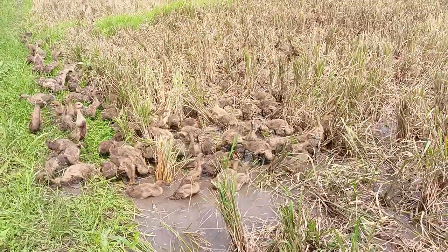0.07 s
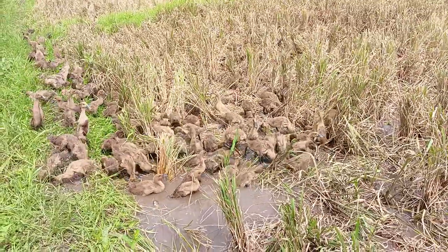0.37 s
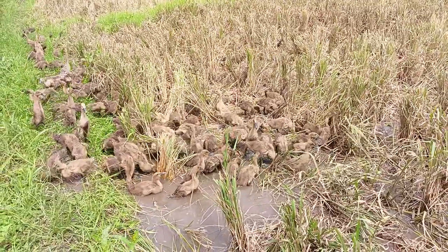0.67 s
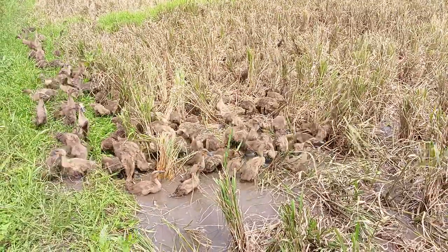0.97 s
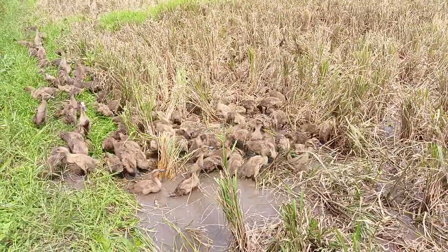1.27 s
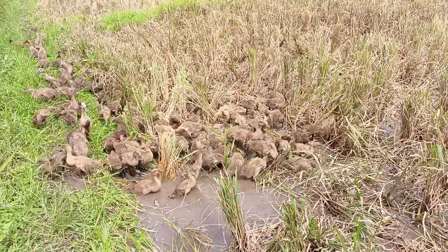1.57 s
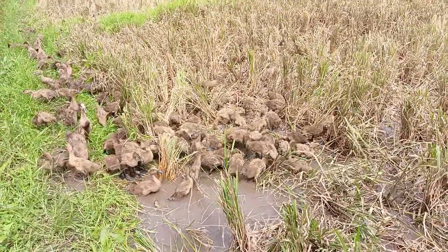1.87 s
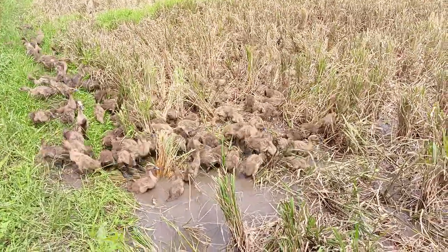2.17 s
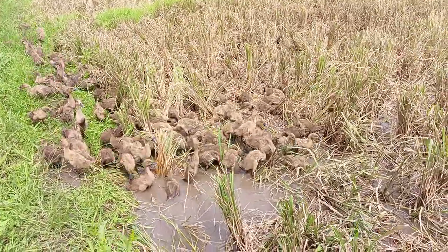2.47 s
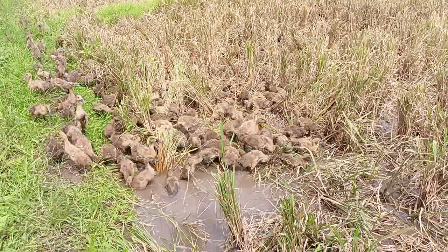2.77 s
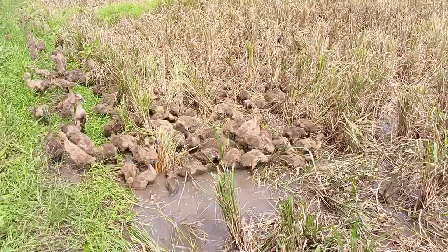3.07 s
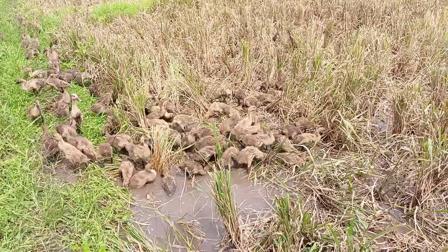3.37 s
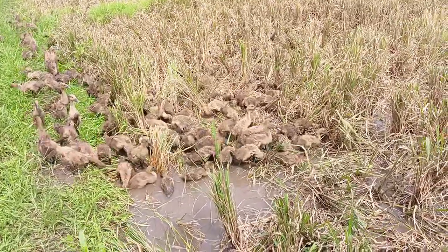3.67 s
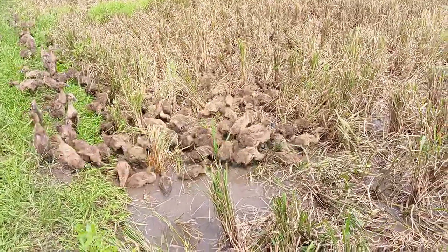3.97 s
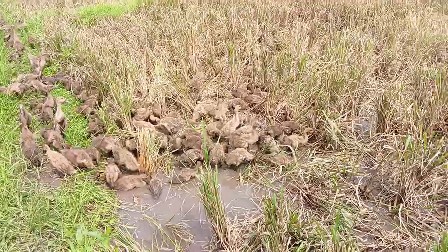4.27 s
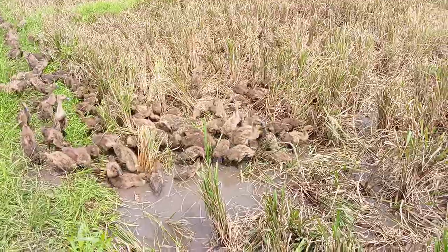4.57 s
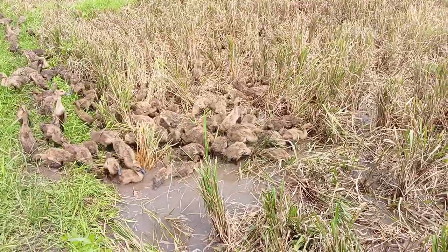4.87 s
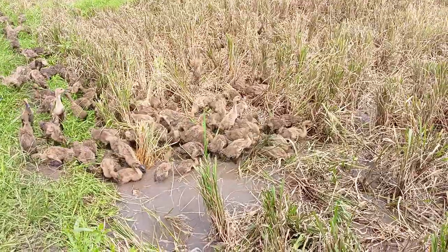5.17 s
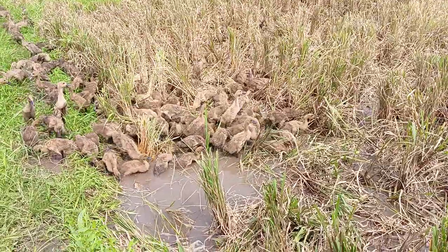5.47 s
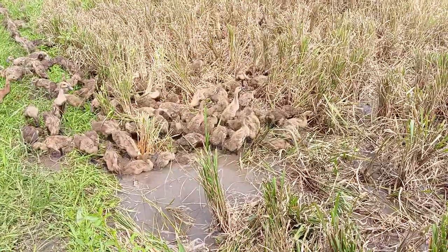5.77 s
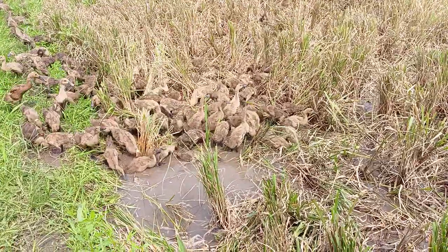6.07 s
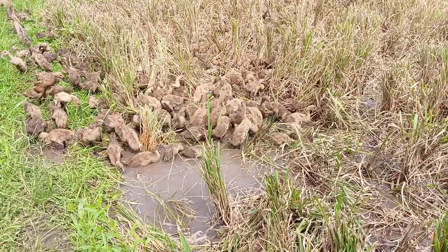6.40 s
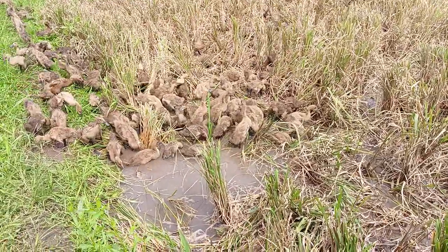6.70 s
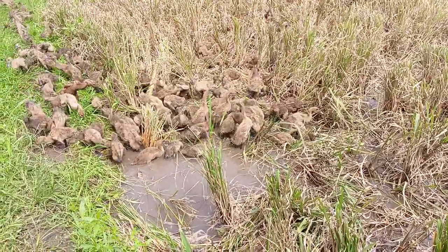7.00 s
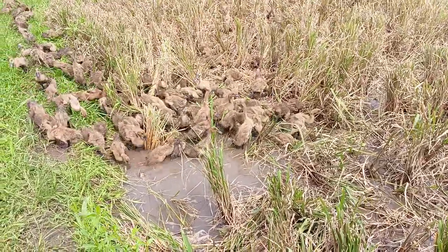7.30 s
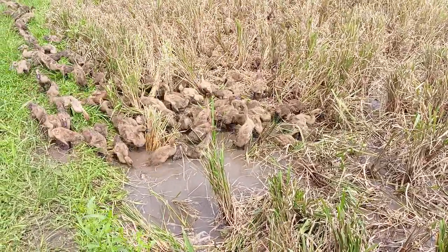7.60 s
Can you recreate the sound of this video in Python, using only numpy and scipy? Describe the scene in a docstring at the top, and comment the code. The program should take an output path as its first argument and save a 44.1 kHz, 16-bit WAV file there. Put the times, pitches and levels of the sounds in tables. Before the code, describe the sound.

At the muddy edge of a field, many young ducks call in thin, slightly hoarse peeps, a few standing out from the chorus. Their feeding makes a steady wet patter with little splashes, plops and crackling dry straw. Low gusts of wind soon buffet the microphone, more on the left, are strongest around four seconds and ease toward the end.

```python
"""From the start, ducklings a few metres away at the muddy edge of a rice field peep over one another in
short arched whistles, while their bills set bubbles ringing and their feet crack the straw. At 0.7 s
the wind rises, and its turbulent pressure buffets the two microphone ports, the left one more.
The loudest wet slaps follow near 1 s. The gusts peak just after 4 s and then weaken, while the
peeping and feeding go on to the end over the hush of the field."""
import sys
import numpy as np
from scipy import signal
from scipy.fft import rfft, irfft, next_fast_len
from scipy.io import wavfile

SR = 44100
rng = np.random.default_rng(int(sys.argv[2]) if len(sys.argv) > 2 else 0)


def output_pcm(signal):
    """Save a mono or channel-first signal as 16-bit PCM at the path in sys.argv[1].

    Samples are clipped to [-1, 1] before scaling.
    """
    pcm = np.clip(np.atleast_2d(signal).T, -1, 1) * 32767
    wavfile.write(sys.argv[1], SR, np.round(pcm).astype(np.int16))


N = 336924

PEEP_FALL, PEEP_GLIDE = .02, 0.0395   # mean fall and its spread per half call, as shares of the pitch
# Near calls: (mid time [s], mid frequency [Hz], duration [s], relative level [dB], left-right [dB])
NEAR_CALLS = [(.019, 2090, 0.065, -37, 9), (.03, 2630, 0.034, -31, -7), (0.067, 2406, 0.054, -34.5, -6),
              (.152, 2380, .045, -36, 0), (0.25, 2740, 0.0445, -39.5, -1), (.337, 2705, .045, -30.5, 1),
              (.402, 2670, 0.028, -32, 7), (1.14, 2430, 0.093, -37, 1), (1.26, 2670, 0.038, -31, 6),
              (1.384, 3420, .04, -43, -2), (1.463, 1790, 0.096, -45, -5), (1.76, 2240, 0.043, -35.5, -5),
              (1.976, 2560, 0.063, -36.5, -5), (2.133, 2520, .04, -37, -5), (2.235, 2560, 0.03, -36.5, -1),
              (2.273, 2650, .045, -35.5, 8), (2.451, 2515, 0.047, -38, 9), (2.627, 1900, .05, -41.5, 5),
              (2.728, 2310, 0.081, -39, 0), (2.82, 2640, 0.11, -35.5, 5), (3.108, 2130, .08, -45, 4),
              (3.152, 2530, 0.056, -38, 0), (3.549, 2900, 0.053, -41, -6), (3.708, 2480, .08, -35, 0),
              (3.78, 2640, 0.06, -39, 1), (3.837, 2580, .06, -32, 7), (3.909, 2820, 0.034, -43, 2),
              (4.157, 2500, 0.047, -35, -4), (4.635, 2580, 0.056, -37, -6), (4.664, 2377, 0.077, -28, -17),
              (4.837, 2350, .055, -33.5, 0), (4.951, 2750, 0.05, -32, 2), (5.037, 2730, 0.025, -33.5, 7),
              (5.205, 2624, .055, -38.5, 1), (5.49, 2750, 0.061, -39.5, -1), (5.517, 2130, 0.066, -40, -2),
              (5.777, 2690, 0.058, -35, -6), (6.049, 2720, 0.029, -36, -3), (6.133, 2650, 0.031, -35, -5),
              (6.693, 2205, 0.036, -34.5, -6), (6.771, 2280, 0.044, -34, -7.5),
              (6.808, 2100, 0.057, -35.5, 3), (7.02, 2610, 0.044, -36, -7), (7.21, 2310, 0.036, -33, -2),
              (7.448, 3070, 0.037, -42, -10)]
def near_birds(level_db=-3.73):
    """Frequency glide: the peeps that stand out of the flock slide down more often than up."""
    out = np.zeros((2, N))
    for s, hz, length, db, pan_db in NEAR_CALLS:
        call = peep(hz, length, PEEP_GLIDE * rng.normal() - PEEP_FALL, hoarse=0.67, port_phase=1.0)
        add(out, s - length / 2, from_db(db + level_db) * panned(pan_db) * call)
    return out


def peep(hz, length, glide, hoarse, arch=0.1184, waver=0.019, rough=0.66, octave_db=-28, port_phase=1.22):
    """Modulation: a whistle arches in frequency and amplitude; random jitter in both makes it hoarse."""
    size = max(int(length * SR), 64)
    u = np.linspace(-1, 1, size)
    pitch = hz * (1 + glide * u - arch * u ** 2 + hoarse * waver * drift(489.5, size=size))
    # each bird stands at its own angle, so it reaches the ports out of step
    phase = 2 * np.pi * np.cumsum(pitch) / SR + np.array([[.5], [-.5]]) * port_phase * rng.normal()
    swell = np.abs(np.cos(u * np.pi / 2)) ** 1.4 * (1 + hoarse * rough * drift(487.3, size=size))
    return np.sqrt(2) * swell * (np.sin(phase) + from_db(octave_db) * np.sin(2 * phase))


# Calling of the rest of the flock, with a few lulls: (time [s], relative level [dB])
FLOCK_ENVELOPE = [(0, -52), (.45, -43.5), (.56, -57.5), (.82, -46.5), (1.0, -51), (1.12, -44),
                  (1.28, -45.5), (1.35, -53), (1.5, -47), (2.9, -47.5), (3.0, -45.5), (3.28, -41),
                  (3.33, -64), (3.5, -55), (3.6, -45), (5.4, -47.5), (6.9, -46.5), (7.64, -47)]
def flock(far_db=-1.0, middle_db=-9.5, low_db=-58):
    """Superposition: a blur of far peeps, clearer ones from mid-flock and faint low chirps add up."""
    far = from_db(far_db) * chorus(2480, spread=.135, length=.055, hoarse=0.86, count=420, uneven_db=2.5)
    middle = chorus(2542, spread=.16, length=0.077, hoarse=0.72, count=80, uneven_db=3.5)
    low = from_db(low_db) * chorus(1748, spread=0.1, length=.045, hoarse=1.0, count=90)
    return from_db(in_time(FLOCK_ENVELOPE)) * (far + from_db(middle_db) * middle) + low


def chorus(centre_hz, spread, length, hoarse, count, uneven_db=3.0):
    """Incoherent sources: many birds call, each at its own pitch and moment; rms 1."""
    out = np.zeros((2, N))
    for k, (pitch, size, glide, loud, side, late) in enumerate(rng.standard_normal((count, 6))):
        hz = centre_hz * np.exp(spread * np.tanh(pitch))
        call = peep(hz, length * np.exp(.25 * size), 0.0496 * glide - PEEP_FALL, hoarse)
        onset = (k + late / 2) / count * N / SR - length / 2
        add(out, onset, from_db(uneven_db * loud) * panned(4 * side - 1.5) * call)
    return rms_one(out)


# Activity of bills and feet: (time [s], relative level [dB])
FEEDING_ENVELOPE = [(0, -46.5), (.7, -49.5), (1.65, -48.5), (1.85, -49.5), (2.3, -47.5), (3.7, -48.5),
                    (4.35, -51.5), (4.65, -50), (4.8, -46), (5.2, -51.5), (6.1, -48), (6.27, -53),
                    (6.55, -51), (7.64, -48.5)]
# Spectral weighting of the bubbles: (frequency [Hz], relative gain [dB])
BUBBLE_SPECTRUM = [(350, 0), (700, -7), (1050, 0.5), (1400, -2), (1800, 1.5), (3000, -2.5), (3500, 4),
                   (4200, 0), (5200, -11), (7400, -10), (9500, -21), (12000, -23), (15500, 16.5)]
def dabbling(per_s=7500, size_db=2.0, clump_db=2.5, level_db=0.5, bands=30, cycles=17):
    """Bubble resonance: bills sieve the mud, freeing clumps of tiny bubbles that each ring briefly."""
    out, busy = np.zeros((2, N)), from_db(clump_db * drift(30))
    underflow_guard = 1e-18 * rng.standard_normal((2, N))
    for hz in np.geomspace(400, 12000, bands):
        rate = per_s / bands * (hz / 3000) ** (3 / 4)   # small bubbles are commoner
        births = np.flatnonzero(rng.random(N) < rate / SR * busy)
        sizes = from_db(size_db * np.minimum(rng.exponential(1, len(births)), 4))
        impulses = underflow_guard.copy()
        impulses[:, births] = sizes * rng.standard_normal((2, len(births)))
        radius, angle = from_db(-60 * hz / (cycles * SR)), 2 * np.pi * hz / SR
        bubble = [1 - radius, 0, radius - 1, 1, -2 * radius * np.cos(angle), radius * radius]
        # the resonance acts twice, so each bubble swells softly
        out += signal.sosfilt([bubble, bubble], impulses) / hz ** (3 / 8)
    return from_db(in_time(FEEDING_ENVELOPE) + level_db) * colour(paired(out), BUBBLE_SPECTRUM)


# The loudest wet impacts: (time [s], peak level [dB], centre frequency [Hz])
WET_IMPACTS = [(.289, -38, 2880), (0.885, -35, 3650), (1.026, -26, 3800), (1.035, -29.5, 4000),
               (1.09, -26.5, 1720), (1.09, -29, 3930), (1.118, -37.5, 1120), (2.311, -29.5, 3660),
               (2.512, -40, 1650), (2.973, -27, 1520), (3.289, -32.5, 1800), (3.958, -31, 3700),
               (4.823, -40, 1230), (5.059, -31, 1700), (6.515, -33, 3000), (6.769, -33, 3960),
               (7.477, -35.5, 1750)]
def slaps(decay_s=0.0057, rise_s=.0005, width_hz=750):
    """Cavity resonance: a foot or bill hits mud or water, and noise rings in the pocket it opens."""
    out, t = np.zeros((2, N)), np.arange(2048) / SR
    fade = (1 - np.exp(-t / rise_s)) * np.exp(-t / decay_s)
    for s, db, hz in WET_IMPACTS + small_slaps():
        band = [max(hz - width_hz / 2, hz / 2), hz + width_hz / 2]
        pocket = signal.butter(2, band, "band", fs=SR, output="sos")
        splash = signal.sosfilt(pocket, paired(rng.standard_normal((2, len(t)))) * fade)
        add(out, s - rise_s, from_db(db) * rms_one(splash) * np.sqrt(np.mean(fade ** 2)))
    return out


def small_slaps(count=24, peak_db=-41, uneven_db=3.5, low_hz=1200, high_hz=5050):
    """Random timing: one faint wet impact falls in each equal interval; rows as in WET_IMPACTS."""
    return [((k + when) / count * N / SR,
             peak_db - uneven_db * (2 * soft - 1),
             low_hz * (high_hz / low_hz) ** pitch)
            for k, (when, soft, pitch) in enumerate(rng.random((count, 3)))]


# Single bubbles and droplets: (time [s], level [dB], starting frequency [Hz])
SINGLE_BUBBLES = [(.268, -42, 800), (.436, -36.5, 375), (1.215, -42, 970), (2.297, -43.5, 620),
                  (3.025, -43, 557), (3.36, -48, 9000), (3.445, -48, 9300), (5.094, -35, 450),
                  (5.256, -39.5, 455), (5.654, -43, 460), (5.976, -45, 6570), (6.684, -43, 460),
                  (6.828, -39, 442)]
def plops(decay_s=0.0086, rise_s=0.00054, climb_per_s=15.3):
    """Damped oscillation: a bubble rings, and its natural frequency climbs as it surfaces."""
    out, t = np.zeros((2, N)), np.arange(4096) / SR
    fade = (1 - np.exp(-t / rise_s)) * np.exp(-t / decay_s)
    for s, db, hz in SINGLE_BUBBLES:
        tone = np.sin(2 * np.pi * np.cumsum(hz * (1 + climb_per_s * t)) / SR)
        add(out, s, from_db(db) * panned(0) * tone * fade)
    return out


# Straw snaps and bill clicks: (time [s], relative level [dB], relative left-right [dB])
CRACKS = [(0.2872, -38, 2), (1.6326, -33.5, 2), (2.0062, -38, -3), (3.349, -39, -3), (6.08, -35, -4),
          (6.1246, -36, 1), (6.4797, -40.5, -4), (6.7682, -35.5, -6), (6.937, -40, 0)]
# Spectrum of a crack: (frequency [Hz], relative gain [dB])
CRACK_SPECTRUM = [(800, -1), (2500, 4), (4000, 10.5), (5500, -0.5), (9000, -5.5), (16000, -30)]
def snaps(decay_s=0.0048, after_db=-13, after_decay_s=0.033, level_db=-1.0, left_bias_db=3.0):
    """Brittle fracture: a dry stalk cracks in a broadband burst, and its fibres crackle briefly after."""
    out, t = np.zeros((2, N)), np.arange(4096) / SR
    fade = np.exp(-t / decay_s) + from_db(after_db) * np.exp(-t / after_decay_s)
    for s, db, pan_db in CRACKS:
        crack = colour(paired(rng.standard_normal((2, len(t)))), CRACK_SPECTRUM)
        add(out, s, from_db(db + level_db) * panned(pan_db + left_bias_db) * crack * fade)
    return out


# Spectrum of brushed straw: (frequency [Hz], relative gain [dB])
STRAW_SPECTRUM = [(1500, -22), (4000, 8), (7000, -7), (10000, -7), (12000, -7), (15500, -10)]
def rustle(per_s=550, size_db=1.0, clump_db=3.5, level_db=-8.5):
    """Shot noise: feet and feathers brush the dry straw in a sprinkle of faint, bright ticks."""
    born = rng.random(N) < per_s * from_db(clump_db * drift(12)) / SR
    sizes = from_db(size_db * np.minimum(rng.exponential(1, N), 3))
    ticks = colour(paired(born * sizes * rng.standard_normal((2, N))), STRAW_SPECTRUM)
    return from_db(in_time(FEEDING_ENVELOPE) + level_db) * ticks


def scatter(x, decay_s=0.02, wet_db=-11, delay_s=.003):
    """Diffuse reflection: water and standing straw add a brief echo to the direct sound."""
    t = np.arange(8192) / SR
    echo = rng.standard_normal((2, len(t))) * np.exp(-t / decay_s) * (t > delay_s)
    echo /= np.sqrt(np.sum(echo ** 2, axis=1, keepdims=True))
    return x + from_db(wet_db) * signal.fftconvolve(x, echo, axes=1)[:, :N]


# Pressure spectra of large and small eddies: (frequency [Hz], relative gain [dB])
LARGE_EDDIES = [(20, -40), (40, -10.5), (60, -2), (85, 2.5), (125, 0.5), (200, -8.5), (320, -27.5),
                (500, -50), (900, -81), (2000, -83)]
SMALL_EDDIES = [(50, -26), (150, 14), (280, 3), (420, -7.5), (700, -32), (1200, -33), (2500, -72)]
def wind(lumps_db=3.5, surge_db=2.0, flutter_db=-10, strong_db=-25, brightening=0.99):
    """Turbulence: each port has its own lumpy pressure; stronger gusts shed smaller, higher eddies."""
    strength = gusts()
    lumps = rms_one(from_db([lumps_db * drift(60) + surge_db * drift(14) for port in range(2)]))
    rumble = colour(rng.standard_normal((2, N)), LARGE_EDDIES)
    flutter_gain = from_db(flutter_db) * (strength / from_db(strong_db)) ** brightening
    flutter = flutter_gain * colour(rng.standard_normal((2, N)), SMALL_EDDIES)
    return strength * lumps * (rumble + flutter)


# The breeze between gusts: (time [s], relative level [dB])
BREEZE_ENVELOPE = [(0, -56), (.58, -54.5), (.75, -46), (2.0, -44), (2.18, -52), (2.4, -42.5), (3.6, -48),
                   (4.8, -44.5), (5.4, -52.5), (5.95, -55), (6.2, -47), (7.64, -50)]
# Gusts on the ports: (onset [s], duration [s], level [dB], left-right [dB])
PORT_GUSTS = [(0.897, 0.023, -35, 14), (1, 0.24, -31, 29), (1.356, 0.018, -35, 13), (1.452, 0.21, -32.5, 2),
              (1.708, 0.28, -29.5, 7), (2.254, 0.046, -33.5, 14), (2.397, 0.1, -29.5, 3),
              (2.532, 0.26, -28.5, 24), (2.767, 0.19, -33, 6), (3.07, 0.042, -33, 31),
              (3.458, 0.1, -36.5, 27), (3.75, 0.11, -31.5, -7), (4.012, 0.24, -26, 0.5),
              (4.206, 0.17, -22.5, 10), (4.481, 0.2, -31, 1), (4.98, 0.1, -43.5, -10), (6.065, .2, -38, 15),
              (6.383, 0.025, -38, 9), (6.546, 0.15, -38.5, 17), (6.806, 0.018, -36.5, 20),
              (7.238, 0.14, -36, -4)]
def gusts(breeze_db=2.5, breeze_pan_db=1.0, attack_s=0.013, release_s=0.018):
    """Addition of powers: breeze and gusts combine into the wind's amplitude at each port."""
    t = np.arange(SR) / SR
    power = (from_db(in_time(BREEZE_ENVELOPE) + breeze_db) * panned(breeze_pan_db)) ** 2
    attack = np.minimum(t / attack_s, 1)
    for s, length, db, pan_db in PORT_GUSTS:
        release = np.exp(-np.maximum(t - length, 0) / release_s)
        add(power, s - attack_s / 2, (attack * from_db(db) * release * panned(pan_db)) ** 2)
    return np.sqrt(power)


# Thumps of single eddies: (time [s], relative level [dB], frequency [Hz], left-right [dB])
EDDY_THUMPS = [(0.714, -14, 126, 17), (1.213, -18, 103, 24), (1.491, -17, 189, 39),
               (1.566, -26.5, 304, -16), (2.573, -14, 138, 15), (2.837, -18.5, 193, -28),
               (3.534, -21.5, 149, 28), (4.244, -17.5, 261, -8), (4.344, -10.5, 273, 34),
               (4.356, -18.5, 390, 25), (4.612, -18.5, 168, 21)]
def buffets(width_s=0.008, level_db=-5.0):
    """Pressure fluctuation: an eddy crosses a port and shakes the air for a few uneven cycles."""
    out, t = np.zeros((2, N)), np.arange(-2048, 2048) / SR
    swell = np.exp(-(t / width_s) ** 2)
    for s, db, hz, pan_db in EDDY_THUMPS:
        spectrum = [(hz / 4, -20), (hz / 2, -3), (hz, 0), (hz * 2, -16), (hz * 4, -50), (hz * 8, -90)]
        shake = colour(rng.standard_normal((2, len(t))) * swell, spectrum) * np.sqrt(np.mean(swell ** 2))
        add(out, s + t[0], from_db(db + level_db) * panned(pan_db) * shake)
    return out


# Background spectrum of the field: (frequency [Hz], relative gain [dB])
FIELD_SPECTRUM = [(60, 4), (120, 3.5), (300, 10), (700, -1), (1800, 3.5), (4000, 4), (5200, -10),
                  (7400, -5.5), (8500, -11.5), (9500, -3), (11000, -19), (12500, -18.5), (13500, -3.5),
                  (15700, -10)]
def field_hiss(level_db=-52, patchy_db=-0.5):
    """Ambient noise: the nearly steady hush of the open field, with a thin hiss on top."""
    hush = colour(paired(rng.standard_normal((2, N))), FIELD_SPECTRUM)
    return from_db(level_db + patchy_db * drift(24)) * hush


# Likeness of the sound at the two ports: (frequency [Hz], correlation [1])
PORT_CORRELATION = [(100, 1), (500, 0.69), (1500, 0), (3000, 0.12), (6000, 0), (15000, 0)]
def paired(x):
    """Partial coherence: two unrelated signals blend into a left and right that are alike in the bass."""
    alike = at_hz(PORT_CORRELATION, bins(x))
    mid, side = shaped(x, np.sqrt([1 + alike, 1 - alike]))
    return np.array([mid + side, mid - side])


def panned(pan_db):
    """Constant-power law: left and right gains for a level difference."""
    gains = from_db(np.array([[.5], [-.5]]) * pan_db)
    return gains / np.sqrt(np.mean(gains ** 2, axis=0))


def colour(x, spectrum):
    """Spectral weighting of x by a curve in decibels; rms 1."""
    return rms_one(shaped(x, from_db(at_hz(spectrum, bins(x)))))


def shaped(x, gains):
    """Zero-phase filtering: one gain for each frequency of x."""
    size = next_fast_len(x.shape[-1], True)
    return irfft(rfft(x, size) * gains, size)[..., :x.shape[-1]]


def bins(x):
    """Fourier frequencies of x."""
    return np.fft.rfftfreq(next_fast_len(x.shape[-1], True), 1 / SR)


def at_hz(points, hz):
    """Interpolation on a log-frequency axis."""
    frequencies, values = np.transpose(points)
    return np.interp(np.log(np.maximum(hz, 1)), np.log(frequencies), values)


def in_time(rows):
    """Linear interpolation of an envelope at every sample."""
    times, levels = np.transpose(rows)
    return np.interp(np.arange(N) / SR, times, levels)


def drift(rate, size=N):
    """Random modulation through `rate` points a second; standard deviation about 1."""
    knots = rng.standard_normal(size // 16 + 4)
    return np.interp(1 + np.arange(size) * rate / SR, np.arange(len(knots)), knots) * np.sqrt(3 / 2)


def from_db(db):
    """Decibels to amplitude ratio."""
    return 10 ** (np.asarray(db) / 20)


def rms_one(x):
    """Normalisation to unit rms."""
    return x / np.sqrt(np.mean(x ** 2) + 1e-20)


def add(out, s, sound):
    """Superposition of a stereo signal from time s."""
    start = int(round(s * SR))
    first, last = max(start, 0), min(start + sound.shape[-1], N)
    if last > first:
        out[:, first:last] += sound[:, first - start:last - start]


def scene():
    """Superposition: birds and mud with their echo, the field's hush, and wind at the microphone."""
    birds = near_birds() + flock()
    mud = dabbling() + rustle() + snaps() + slaps() + plops()
    return scatter(birds + mud) + field_hiss() + wind() + buffets()


# Difference in response between the two ports: (frequency [Hz], left-right [dB])
PORT_RESPONSE = [(300, 0), (1200, 1.5), (2000, 2), (2800, -2), (3400, -5.5), (5000, -4), (7300, -9.5),
                 (8400, -16), (9500, 26), (11000, -18), (12500, 4.5), (14000, -22)]
def record(dry, low_cut_hz=48, high_cut_hz=15880):
    """Frequency response: each port colours its side; the deepest bass and the top are cut."""
    hz = bins(dry)
    high_pass = hz ** 3 / np.sqrt(hz ** 6 + low_cut_hz ** 6)
    low_pass = np.clip((high_cut_hz - hz) / 150, 0, 1)
    return shaped(dry, panned(at_hz(PORT_RESPONSE, hz)) * high_pass * low_pass)


dry = scene()
out = record(dry)
output_pcm(out)
```